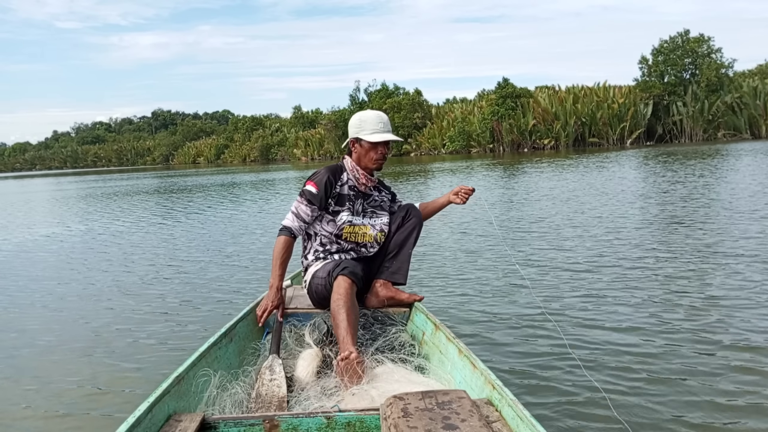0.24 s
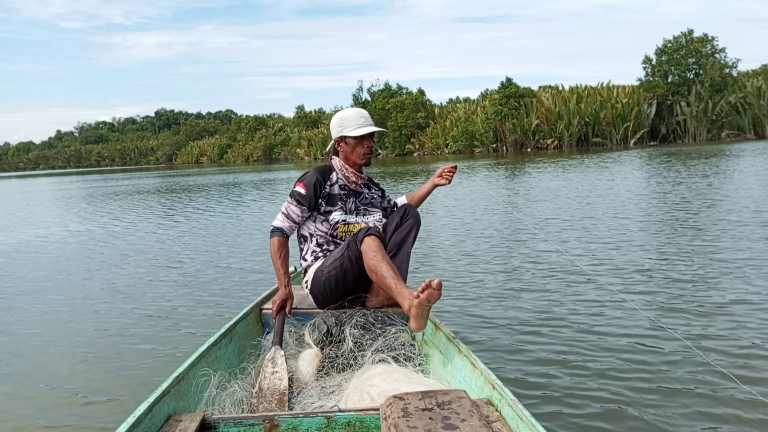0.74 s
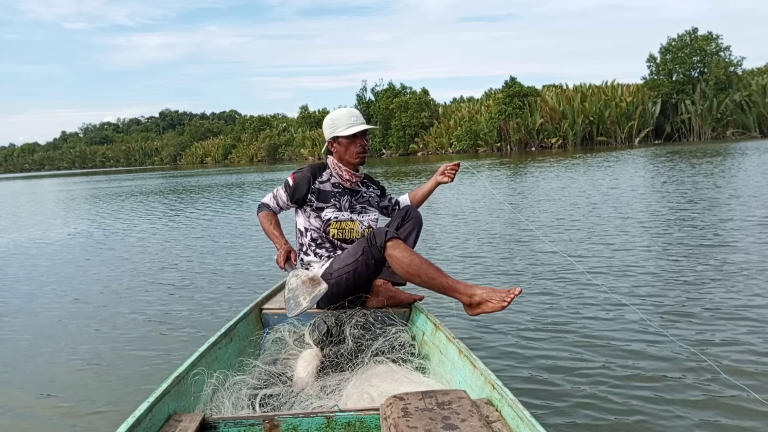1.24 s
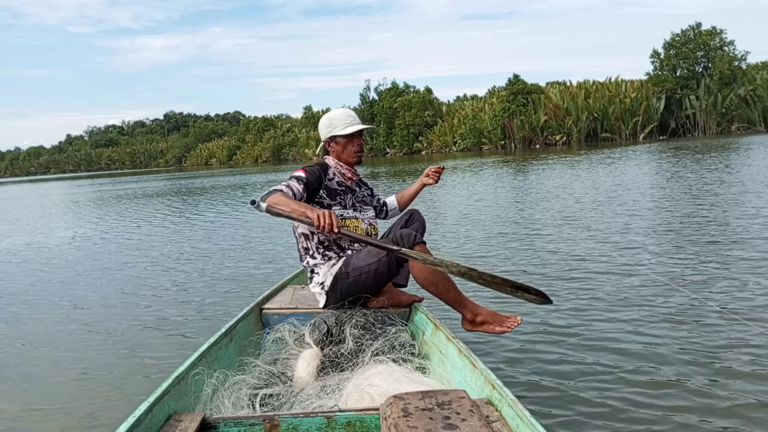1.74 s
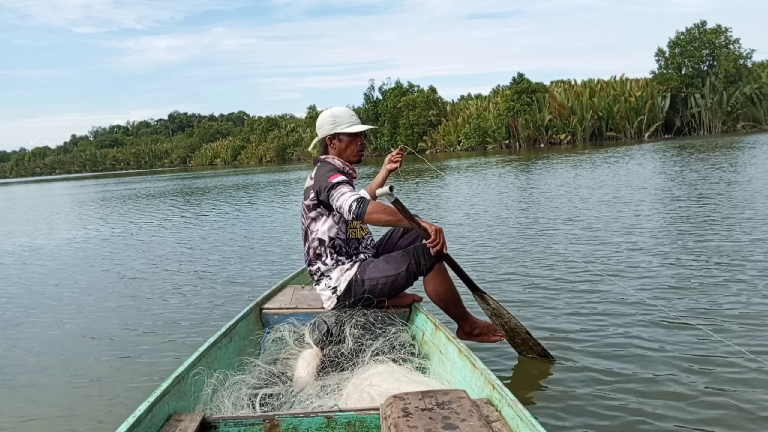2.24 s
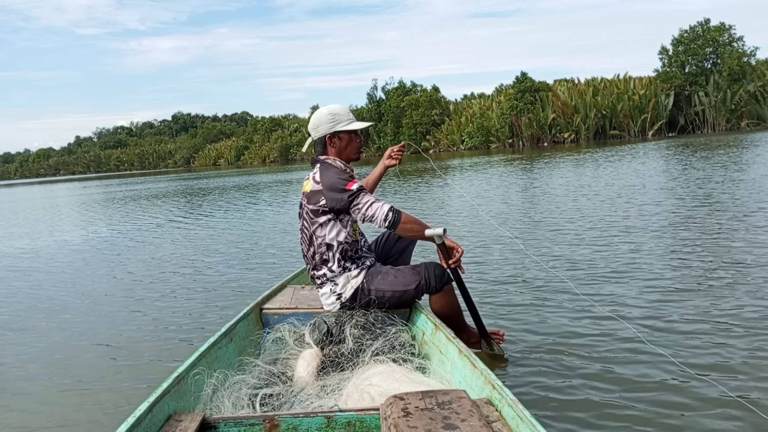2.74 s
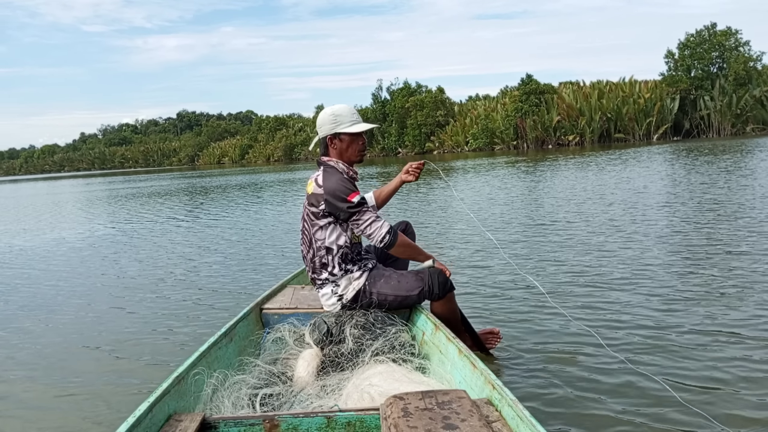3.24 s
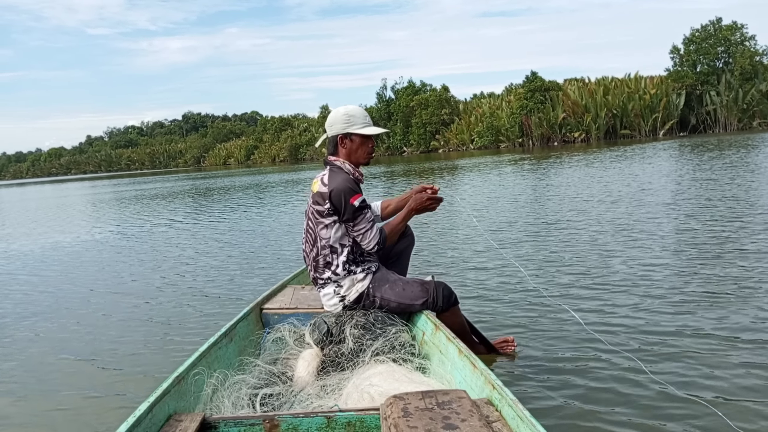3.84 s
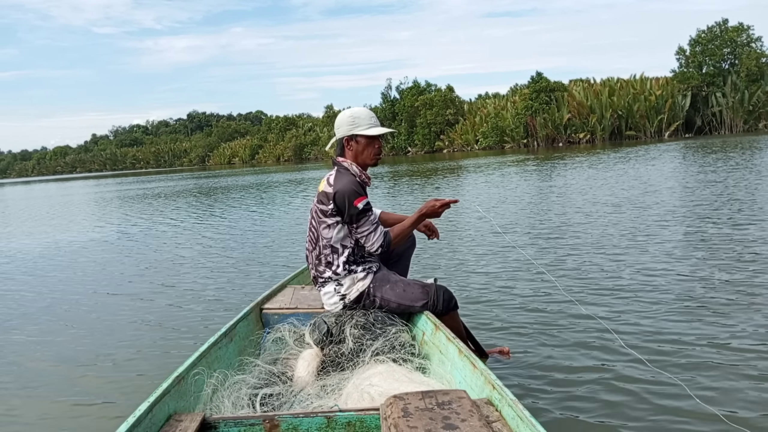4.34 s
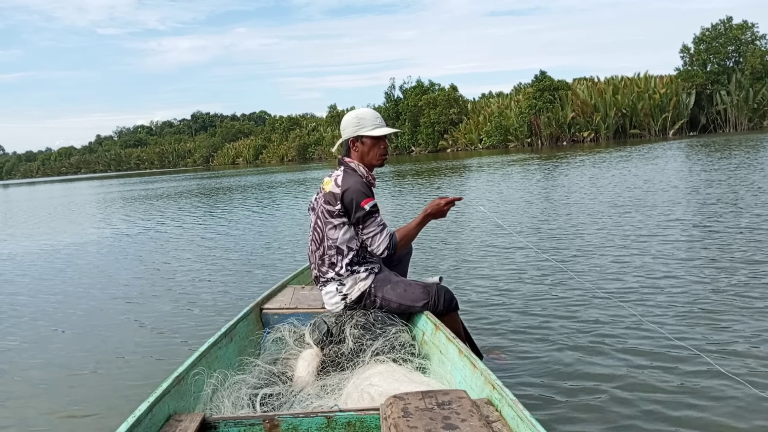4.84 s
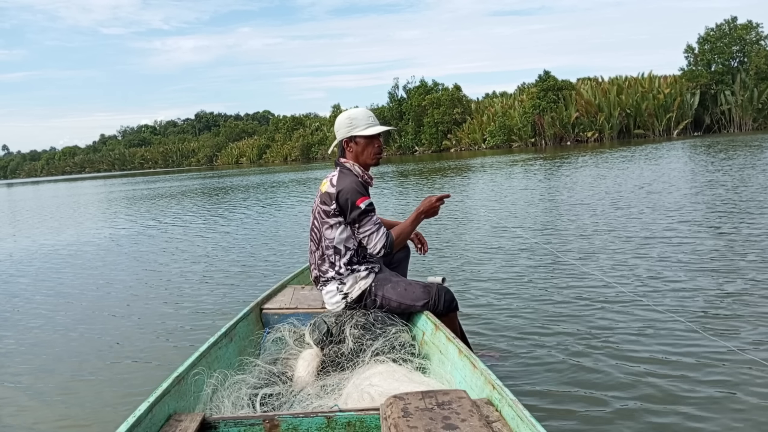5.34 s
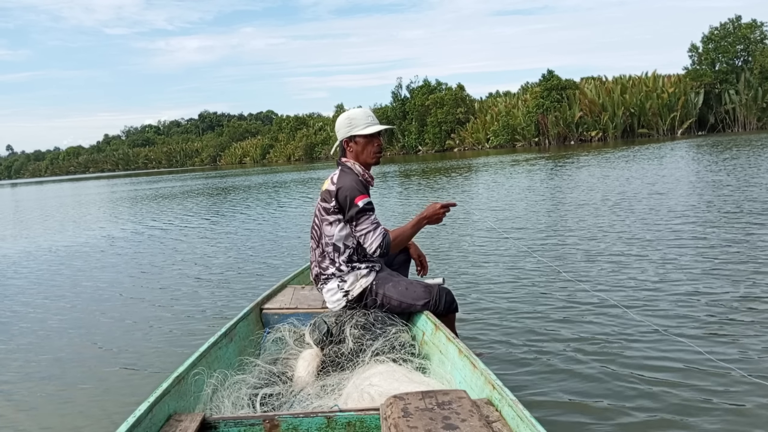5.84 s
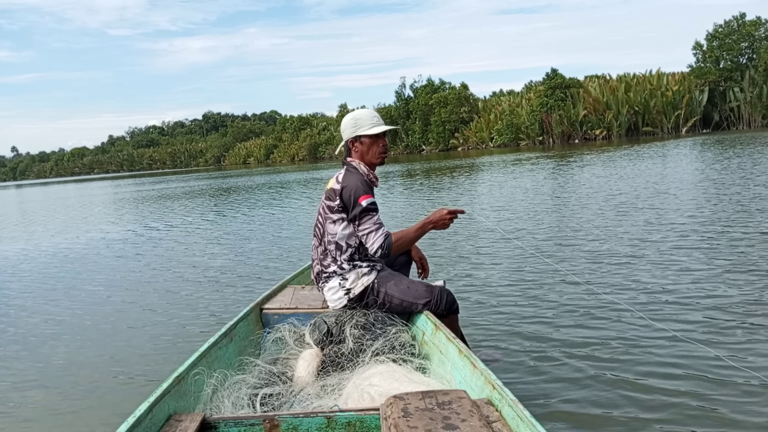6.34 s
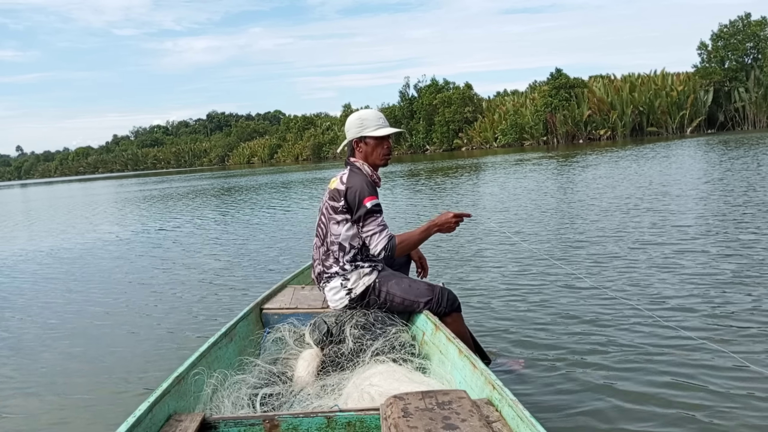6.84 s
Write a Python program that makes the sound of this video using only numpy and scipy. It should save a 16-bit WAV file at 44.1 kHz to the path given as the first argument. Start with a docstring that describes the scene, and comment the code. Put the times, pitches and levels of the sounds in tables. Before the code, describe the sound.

A steady, high cicada chorus comes from the wooded bank of a calm river, with faint peeps over a soft open-air hush. A nearer cicada rasps about twice a second, growing stronger, then settles into a piercing, slowly sinking whine. Wind buffets the outdoor microphone in low thumps, briefly around one and a half seconds and most violently after six, when the insects are momentarily pushed down.

```python
"""Cicadas drone from the wooded bank of a calm river, heard from a small boat: noise bands and sine strands.
A nearer one, a stack of click-modulated sines, winds up in rasping chirps, then holds a slowly sinking
whine. Faint peeps, short gliding sines, come over the water, above an open-air hush of shaped noise.
Wind buffets the microphone in low thumps, short swings of pressure in turbulent noise, and the hardest
ones make the limiter duck everything."""
import sys
import numpy as np
from scipy import signal
from scipy.fft import rfft, irfft, next_fast_len
from scipy.io import wavfile
from scipy.ndimage import uniform_filter1d, minimum_filter1d

SR = 44100
rng = np.random.default_rng(int(sys.argv[2]) if len(sys.argv) > 2 else 0)


def output_pcm(signal):
    """Save a mono or channel-first signal as 16-bit PCM at the path in sys.argv[1].

    Samples are clipped to [-1, 1] before scaling.
    """
    pcm = np.clip(np.atleast_2d(signal).T, -1, 1) * 32767
    wavfile.write(sys.argv[1], SR, np.round(pcm).astype(np.int16))


N = 312228
T = np.arange(N) / SR  # seconds
FREQ = np.fft.rfftfreq(N, 1 / SR)  # Hz

# The blended chorus on the bank, humps of noise near the multiples of its pitch.
# Each row: centre in Hz, width in Hz, relative density in dB per Hz.
CHORUS_HUMPS = [(3226, 133, 1.5), (3218, 258, -9), (6440, 83, -2), (6240, 462, -12), (9270, 480, -27),
                (12600, 390, -25), (15400, 450, -32.5)]
CHORUS_DB = -50.5  # rms before the zeal below
# How keenly the chorus and its strands sing. Each row: time in seconds, gain in dB.
CHORUS_ZEAL = [(0, -6), (.25, -4), (1, -2.5), (2, -2), (3, -2), (4, -1.5), (5, -1.5), (6, -0.5), (6.6, 0),
               (7.08, 0.5)]
# Spectrum of the open air over the river. Each row: frequency in Hz, relative density in dB per Hz.
AIR_SPECTRUM = [(25, -11.5), (50, 11), (85, 14.5), (140, 8), (250, -1), (500, -5.5), (1000, -10.5),
                (2000, -13), (4600, -17.5), (7000, -21), (8000, -27), (11000, -31), (14000, -30),
                (15500, -22.5)]
# Whines of cicadas further off.
# Each row: start in seconds, length in seconds, pitch it sinks towards in Hz, mean level in dB.
FAR_WHINES = [(-2.06, 1.4, 3100, -61), (-0.2, 1, 2975, -65), (-2.5, 3.1, 2850, -65), (0, 1.55, 2840, -69),
              (3.2, 1.73, 3200, -69), (2, 1.6, 3100, -54.5), (6, 2.4, 2885, -65), (9, 2.1, 3500, -61.5)]
# The near cicada winding up, one row a chirp. Each row: crest in seconds, rise in seconds,
# hold in seconds, top pitch before its wobble in Hz, drive level ahead of clicks and body in dB.
CHIRPS = [(0.54, 0.15, .01, 3630, -61), (1.039, .17, .02, 3650, -56), (1.527, 0.16, .02, 3638, -53.5),
          (2.01, .18, .03, 3572, -50), (2.492, .19, .03, 3547, -50), (2.936, .19, .03, 3517, -51),
          (3.326, .19, .05, 3418, -44.5), (3.476, .25, 0.13, 3566, -46)]
# How the chirping body radiates. Each row: frequency in Hz, gain in dB.
BODY_GAIN = [(2700, -4), (2950, 5.5), (3350, -8), (3800, 2), (3930, -2), (4050, -11), (5800, -11),
             (6300, -4), (7100, -5), (7500, -12.5), (7800, -14), (9000, -14), (15000, -10)]
# The clearest peeps and plips over the water.
# Each row: middle in seconds, pitch in Hz, length in seconds, nominal peak before the ragged level in dB.
CLEAR_PEEPS = [(.42, 3780, 0.086, -54), (1.69, 4000, 0.032, -51), (1.685, 4600, .025, -59),
               (2.51, 1180, 0.071, -63.5), (2.567, 2340, 0.22, -61.5), (2.75, 2010, .12, -60.5),
               (2.92, 2010, .18, -67.5), (3.14, 1815, 0.052, -62), (3.35, 4850, 0.1, -62),
               (4.48, 1760, 0.085, -64), (4.52, 5220, .14, -65), (4.7, 1925, 0.096, -65.5)]
# Loose series of fainter peeps. Each row: start in seconds, end in seconds.
PEEP_SERIES = [(0.0, .5), (3.762, 5.3)]
PEEP_GAP_S, PEEP_HZ, PEEP_LENGTH_S, PEEP_DB = .235, 1830, .09, -64.5
# Single thumps of wind on the microphone.
# Each row: time in seconds, peak of the main swing before filter and limiter in dB, frequency in Hz.
THUMPS = [(.236, -41.5, 114), (.992, -31, 124), (1.31, -38, 87.5), (1.421, -12, 134), (1.436, -8.5, 101.4),
          (1.513, -17.5, 99), (1.642, -9.5, 157), (1.684, -19, 104), (2.038, -32.5, 85), (3.411, -21, 103),
          (3.459, -30, 98), (3.602, -38.5, 114.9), (3.96, -35, 84), (4.146, -31.5, 102), (4.621, -24, 139),
          (4.684, -34.5, 87), (4.83, -17.5, 100.2), (5.199, -25, 80), (5.394, -27.5, 75), (6.028, -27, 124),
          (6.105, 0, 133), (6.153, -4.5, 121), (6.181, -1.9, 155), (6.25, -1.5, 162), (6.306, -7, 155.7),
          (6.375, -11, 129.5), (6.456, -2.5, 115), (6.488, -1.5, 159), (6.507, 0, 125), (6.517, .5, 140),
          (6.611, -2.5, 171)]
# Gusts, each a run of random eddies.
# Each row: start in seconds, length in seconds, peak of a typical eddy's main swing in dB.
GUSTS = [(0.962, .12, -43), (1.462, .11, -27), (2.718, .17, -41), (3.82, .15, -42), (4.128, .23, -46),
         (4.588, .1, -34), (6.104, .16, -8), (6.28, .39, -27.5), (6.458, .066, -13), (6.59, .035, -9.5)]
EDDY_GAP_S, EDDY_SCATTER_DB, EDDY_SCATTER_OCTAVES = .014, 4.5, 0.27
# Stronger eddies are faster and hold more fine swirl: values at 0 dB and their slopes.
EDDY_HZ, EDDY_OCTAVES_PER_DB = 155, 0.0384
SWIRL_DB, SWIRL_DB_PER_DB = -5.5, 0.94
# The held whine starts after the last chirp and sinks ever more slowly:
# pitch about 1 s in, and the drop for each e-fold of its age.
WHINE_START_S, WHINE_HZ, WHINE_SAG_HZ = 3.64, 3083, 31
# The whine's fundamental. Each row: time in seconds, level before trim and flutter in dB.
WHINE_FUNDAMENTAL = [(3.64, -58), (4.1, -47), (4.3, -56), (4.85, -64), (5.02, -42.5), (5.5, -49.5),
                     (5.75, -63.5), (6.35, -52), (7.08, -55.5)]
# Swells of the whine's leading second partial.
# Each row: crest in seconds, length in seconds, crest level before trim and flutter in dB.
WHINE_SWELLS = [(3.75, 0.15, -42), (3.94, 0.2, -37.5), (4.215, .22, -42), (4.395, 0.086, -38.5),
                (4.621, 0.31, -37.5), (4.928, 0.24, -37), (5.252, 0.22, -39.5), (6.31, 0.45, -41.5),
                (6.877, 0.8, -43)]
# The quiet, slowly fading level between swells, also before trim.
WHINE_REST_DB, WHINE_REST_DB_PER_S = -45.5, -4
# Cracks of the overloaded microphone in the hardest thumps.
# Each row: time in seconds, peak before the limiter in dB.
CRACKS = [(6.105, -9), (6.507, -15), (6.517, -15)]
TOP_HZ = 15300  # upper edge of the recorder's range


def undb(db):
    """Amplitude from dB."""
    return 10 ** (np.asarray(db) / 20)


def curve(rows):
    """Columns of a table joined by straight lines in time."""
    s, *columns = np.transpose(rows)
    return [np.interp(T, s, c) for c in columns]


def shape(x, gain):
    """Filter by a gain at each frequency."""
    size = next_fast_len(N)
    fitted_gain = np.interp(np.fft.rfftfreq(size, 1 / SR), FREQ, gain)
    return irfft(rfft(x, size) * fitted_gain, size)[:N]


def colour(points):
    """Gain at each frequency from (Hz, dB) points, joined along log frequency."""
    hz, db = np.transpose(points)
    return undb(np.interp(np.log(FREQ + 1), np.log(hz), db))


def noise(gain):
    """Noise of rms 1 with the given gain at each frequency."""
    x = shape(rng.standard_normal(next_fast_len(N)), gain)
    return x / x.std()


def hump(hz, width_hz):
    """Bell-shaped gain round a centre."""
    return np.exp(-((FREQ - hz) / width_hz) ** 2 / 4)


def flutter(rate_hz):
    """Smooth random motion of spread 1."""
    return noise(hump(0, rate_hz))


def turn(hz):
    """Running phase of a moving frequency."""
    return 2 * np.pi * np.cumsum(hz) / SR


def scatter(x, t60, wet_db):
    """Trees on the bank add a diffuse tail that falls 60 dB in t60 seconds."""
    t = T[:SR // 2]
    tail = rng.standard_normal(len(t)) * np.exp(-np.log(1000) * t / t60) * (t > .012)
    return x + undb(wet_db) * signal.fftconvolve(x, tail / np.linalg.norm(tail))[:N]


def chorus(swell_db=0.9, flicker_db=1.5):
    """Countless cicadas blend into bands, each swelling and flickering a little."""
    out = np.zeros(N)
    for hz, width_hz, db in CHORUS_HUMPS:
        level = undb(db + swell_db * flutter(1.8) + flicker_db * flutter(14))
        out += level * np.sqrt(width_hz) * noise(hump(hz, width_hz))
    return undb(CHORUS_DB) * out / out.std()


def strands(count=8, drift=.005, fade_db=5, partial_db=(0, -2.5, -28, -27), strands_db=-49):
    """A few singers stand out of the chorus as wandering strands that fade in and out."""
    out = np.zeros(N)
    for hz in np.linspace(3070, 3265, count):
        phase = turn(hz * (1 + drift * flutter(1.5) + 0.001987 * flutter(30.84)))
        # alternate partials share a fade
        fades = [undb(fade_db * flutter(11.0)) for _ in range(2)]
        for k, db in enumerate(partial_db):
            out += fades[k % 2] * undb(db) * np.sin((k + 1) * phase)
    return undb(strands_db) * out / out.std()


def air(air_db=-56, gust_db=1.5):
    """Soft hush of the open river; its low rumble comes and goes with the breeze."""
    gain = colour(AIR_SPECTRUM) * FREQ ** 2 / (FREQ ** 2 + 25 ** 2)
    low = 1 / np.sqrt(1 + (FREQ / 220) ** 4)
    rumble_share = np.sum((gain * low) ** 2) / np.sum(gain ** 2)  # of the power
    rumble = np.sqrt(rumble_share) * noise(gain * low) * undb(gust_db * flutter(1.3))
    hush = np.sqrt(1 - rumble_share) * noise(gain * np.sqrt(1 - low ** 2))
    return undb(air_db) * (rumble + hush)


def far_cicadas(sag=.035, settle_s=.9, partial_db=(-3, -3, -23, -19), fade_db=3.8):
    """Distant whines sink towards their final pitch, fading gently up and down on the way."""
    out = np.zeros(N)
    for s, length, hz, db in FAR_WHINES:
        age = np.clip(T - s, 0, length)
        phase = turn(hz * (1 + sag * np.exp(-age / settle_s) + 0.0017 * flutter(12.7)))
        gate = np.clip(np.minimum(age, length - age) / 0.16, 0, 1)
        voice = sum(undb(d) * np.sin((k + 1) * phase) for k, d in enumerate(partial_db))
        out += undb(db + fade_db * flutter(4.7)) * gate * voice
    return out


def winding_cicada(low_hz=2970, idle_db=-55, fall_s=0.083, rasp=0.0172, click_hz=296,
                   partial_db=(0, -2.5, -23, -17)):
    """It idles on a low note; each chirp tightens the tymbal, so pitch, level and rasp climb together."""
    lift_hz, strain = np.zeros(N), np.zeros(N)
    idle_fade = np.interp(T, [0, .2, 3.3, 3.6], [0, 0.17, 0.58, 0.12])
    gain = undb(idle_db + 3.1 * flutter(6.6)) * idle_fade
    for s, rise, hold, top_hz, db in CHIRPS:
        effort = np.interp(T, [s - rise, s, s + hold, s + hold + fall_s], [0, 1, 1, 0])
        lift_hz = np.maximum(lift_hz, (top_hz - low_hz) * effort)
        gain += (undb(db) - gain) * effort
        strain = np.maximum(strain, effort)
    pitch = low_hz * (1 + .01 * flutter(5.3)) + lift_hz
    rough_pitch = pitch * (1 + rasp * (0.223 + 0.86 * strain) * flutter(121))
    phase = turn(rough_pitch)
    click_phase = turn(click_hz * (1 + 0.062 * flutter(40)))
    clicks = 1 + (0.14 + 0.34 * strain) * np.cos(click_phase)
    voice = sum(undb(db) * np.sin((k + 1) * phase) for k, db in enumerate(partial_db))
    return scatter(shape(gain * voice * clicks, colour(BODY_GAIN)), t60=0.29, wet_db=-3.5)


def peeps(waver_hz=55, ragged_db=4, spread_octaves=.04, glide_octaves=0.034, count=12):
    """Short ragged notes that glide a little, blurred by distance."""
    out = np.zeros(N)
    wobble, ragged = flutter(120), undb(ragged_db * flutter(60) - 0.5)
    glides = 2 * rng.random(len(CLEAR_PEEPS) + count * len(PEEP_SERIES)) - 1
    notes = list(CLEAR_PEEPS)
    for start, end in PEEP_SERIES:
        for k, (late, high) in enumerate(2 * rng.random((count, 2)) - 1):
            if start + k * PEEP_GAP_S < end:
                s = start + (k + late / 8) * PEEP_GAP_S
                notes.append((s, PEEP_HZ * 2 ** (spread_octaves * high), PEEP_LENGTH_S, PEEP_DB))
    for (s, hz, length, db), glide in zip(notes, glides):
        near = np.abs(T - s) < length / 2
        u = (T[near] - s) / length  # -1/2 to 1/2 along the note
        pitch = hz * 2 ** (glide_octaves * glide * u) + waver_hz * wobble[near]
        out[near] += undb(db) * ragged[near] * np.cos(np.pi * u) * np.sin(turn(pitch))
    return scatter(out, t60=0.52, wet_db=-11.5)


def swing(t, hz, cycles, angle):
    """One short swing of pressure, peak 1."""
    y = np.exp(-(t * hz / cycles) ** 2 / 2) * np.sin(2 * np.pi * hz * t + angle)
    return y / np.abs(y).max()


def eddies(count=40):
    """The single thumps and the random eddies of every gust, as (s, peak dB, Hz)."""
    rows = list(THUMPS)
    for start, length, gust_db in GUSTS:
        for k, (late, strong, fast) in enumerate(2 * rng.random((count, 3)) - 1):
            if k * EDDY_GAP_S < length:
                s = start + (k + late / 4) * EDDY_GAP_S
                db = gust_db + EDDY_SCATTER_DB * strong
                octaves = EDDY_OCTAVES_PER_DB * db + EDDY_SCATTER_OCTAVES * fast
                rows.append((s, db, EDDY_HZ * 2 ** octaves))
    return rows


def wind(cycles=0.47, swirl_ratio=1.93, swirl_cycles=0.97, wake_s=0.013, wake_db=-17, wake_hz=235,
         tear_db=-19, tear_hz=500, roll_s=0.04, roll_db=-27, count=400):
    """Each eddy is a swing of pressure with a finer swirl inside, in a wake that hard ones tear up."""
    thumps, stir_power, linger = np.zeros(N), np.zeros(N), np.zeros(N)
    for (s, db, hz), (angle, twist) in zip(eddies(), rng.uniform(0, 2 * np.pi, (count, 2))):
        near = slice(*np.searchsorted(T, [s - .15, s + .15]))
        t = T[near] - s
        swirl_level = undb(SWIRL_DB + SWIRL_DB_PER_DB * db)
        swirl = swirl_level * swing(t, swirl_ratio * hz, swirl_cycles, twist)
        thumps[near] += undb(db) * (swing(t, hz, cycles, angle) + swirl)
        stir_power[near] += undb(db) ** 2 * np.exp(-(t / wake_s) ** 2)
        linger[near] += undb(db) * np.exp(-((t - roll_s / 3) / roll_s) ** 2)
    stir = np.sqrt(stir_power)
    wake_gain = FREQ ** 2 / (FREQ ** 2 + 110 ** 2) / (1 + (FREQ / wake_hz) ** 8)
    wake = undb(wake_db) * stir ** 1.43 * noise(wake_gain)
    # the steeper power keeps the brighter tearing to the hard eddies
    tear_gain = FREQ / (FREQ + 200) / (1 + (FREQ / tear_hz) ** 9)
    tear = undb(tear_db) * stir ** 3.37 * noise(tear_gain)
    roll = undb(roll_db) * linger ** 0.76 * noise(hump(76, 26))  # the largest swirls die last
    return shape(thumps + wake + tear + roll, FREQ ** 6 / (FREQ ** 6 + 48 ** 6))


def whining_cicada(click_hz=318, click_depth=0.085, trim_db=(-3, -.5), fourth_db=-67.0, rasp_db=-14,
                   side_db=(3.5, 2.5), click_jitter=.022, fade_db=2):
    """A nearly pure whine led by its swelling second partial; tymbal clicks add side tones and a thin rasp."""
    age = np.maximum(T - WHINE_START_S, 0)
    pitch = WHINE_HZ - WHINE_SAG_HZ * np.log(age + .015)
    phase = turn(pitch * (1 + 0.00072 * flutter(25)))

    low_db, = curve(WHINE_FUNDAMENTAL)
    first = undb(low_db + trim_db[0] + fade_db * flutter(11))
    swells = [undb(db) * (1 - np.abs(2 * (T - s) / length) ** 3) for s, length, db in WHINE_SWELLS]
    rest = undb(WHINE_REST_DB + WHINE_REST_DB_PER_S * age)
    second = np.maximum(np.max(swells, axis=0), rest) * undb(trim_db[1] + 1.2 * flutter(18))
    fourth = undb(fourth_db + 2 * flutter(5)) * np.minimum(age / .5, 1)
    body = np.sqrt(second * undb(-45.5))  # side tones fade less than the main one

    voice = first * np.sin(phase) + second * np.sin(2 * phase) + fourth * np.sin(4 * phase)
    voice += body * undb(-38) * flutter(40) * (np.sin(3 * phase) + np.sin(5 * phase))
    clicks = turn(click_hz * (1 + click_jitter * flutter(63)))
    upper, lower = (click_depth * body * undb(db + 1.7 * flutter(10.0)) for db in side_db)
    voice += upper * np.sin(2 * phase + clicks) + lower * np.sin(2 * phase - clicks)
    rasp = body * undb(rasp_db) * noise(hump(6120, 210) + undb(-16.5) * hump(12600, 250))
    return (np.sqrt(2) * voice + rasp) * np.clip(age / 0.0075, 0, 1)


def cracks(crack_s=0.00036):
    """The hardest thumps overload the microphone with a sharp crack."""
    return sum(undb(db) * np.exp(-np.abs(T - s) / crack_s) for s, db in CRACKS)


def scene():
    """Insects on the bank, peeps and open air over the water, with wind on the microphone."""
    zeal_db, = curve(CHORUS_ZEAL)
    bank = undb(zeal_db) * (chorus() + strands())
    singers = far_cicadas() + winding_cicada() + whining_cicada()
    return (bank + singers + air() + peeps() + wind() + cracks())[None]


def limiter(x, threshold_db=-3, release_db_per_s=8, attack_s=0.00073):
    """The gain drops just ahead of a peak that passes the threshold, then creeps back."""
    over_db = np.maximum(20 * np.log10(np.abs(x) + 1e-9) - threshold_db, 0)
    recovery_db = release_db_per_s * T
    # the running maximum holds each cut, less what has since been released
    cut_db = np.maximum.accumulate(over_db + recovery_db, axis=-1) - recovery_db
    size = int(attack_s * SR) + 1
    early_db = minimum_filter1d(-cut_db, 2 * size)
    return x * undb(uniform_filter1d(uniform_filter1d(early_db, size), size))


def record(dry):
    """The recorder limits the thumps and cuts the top."""
    top_cut = signal.ellip(10, .1, 80, TOP_HZ, fs=SR, output="sos")
    return signal.sosfilt(top_cut, limiter(dry))


dry = scene()
out = record(dry)
output_pcm(out)
```